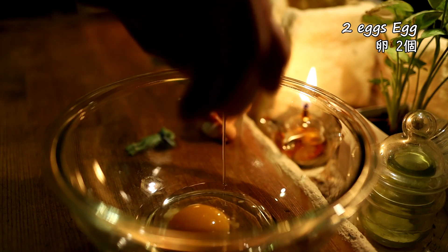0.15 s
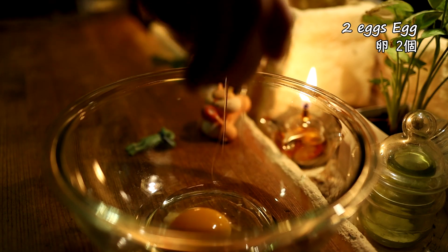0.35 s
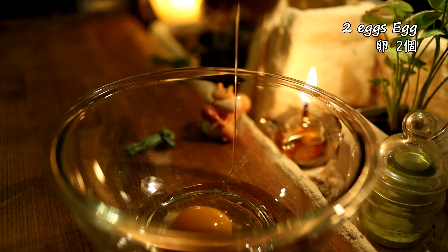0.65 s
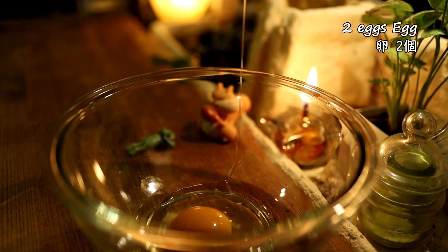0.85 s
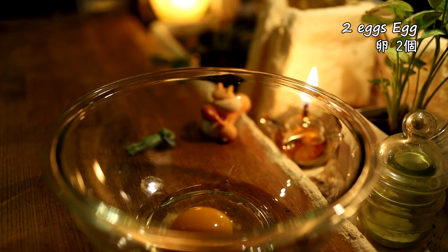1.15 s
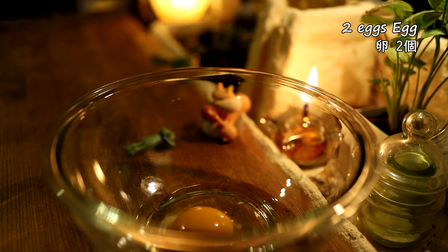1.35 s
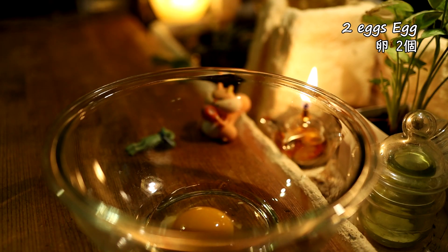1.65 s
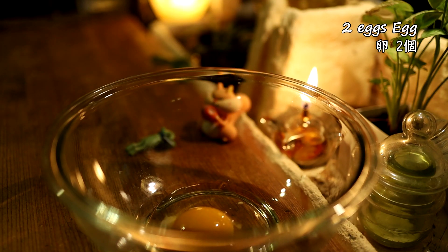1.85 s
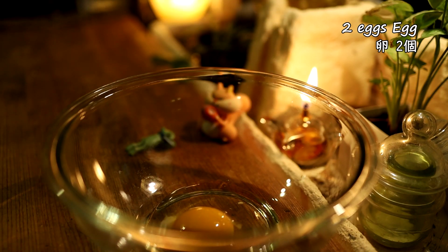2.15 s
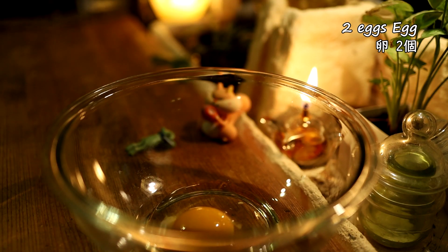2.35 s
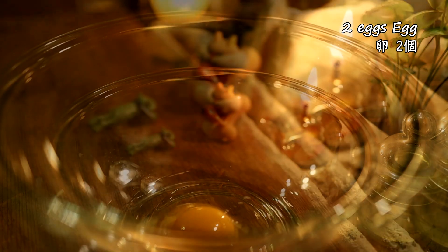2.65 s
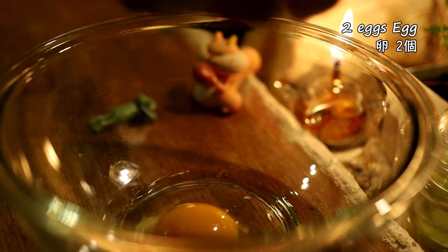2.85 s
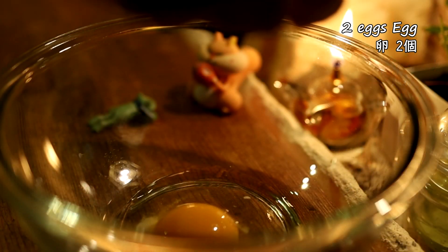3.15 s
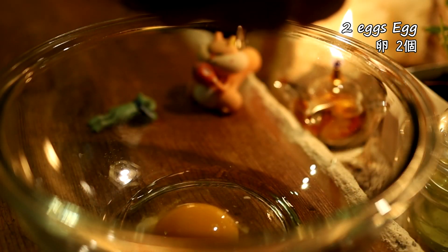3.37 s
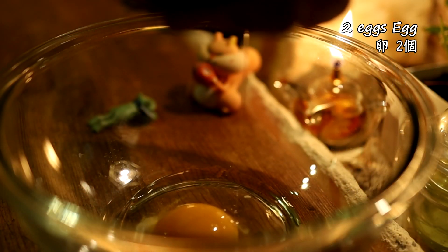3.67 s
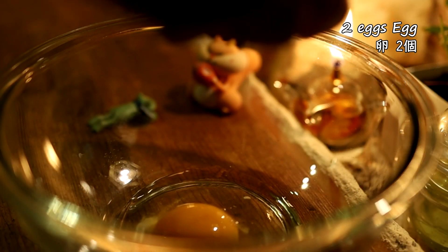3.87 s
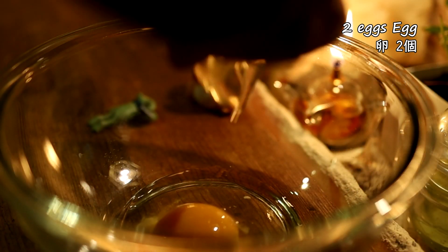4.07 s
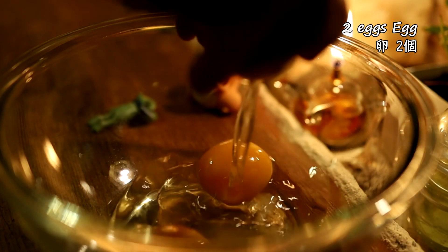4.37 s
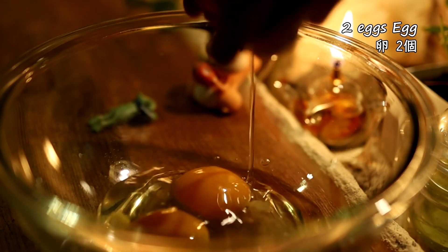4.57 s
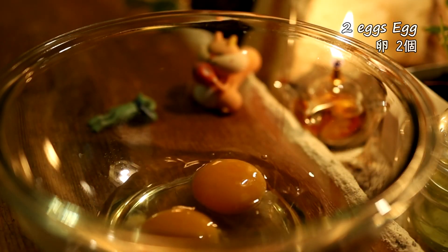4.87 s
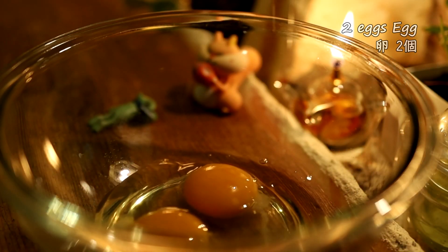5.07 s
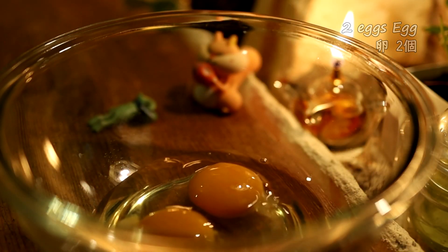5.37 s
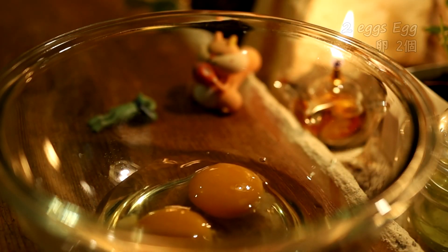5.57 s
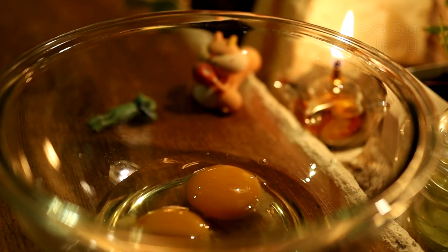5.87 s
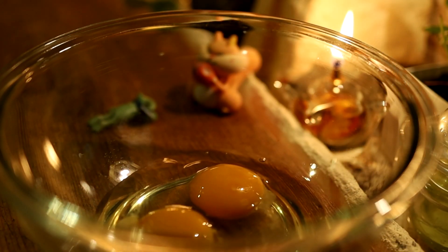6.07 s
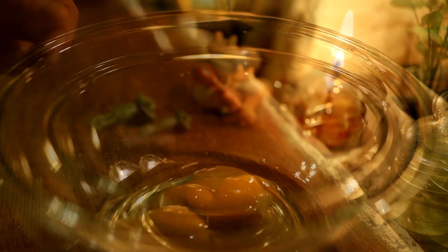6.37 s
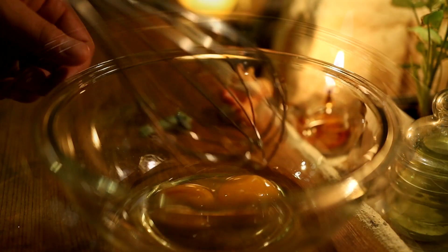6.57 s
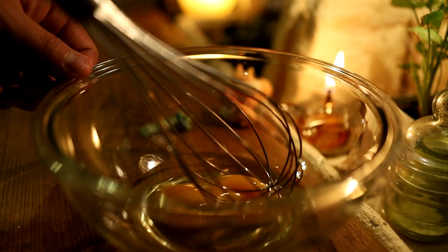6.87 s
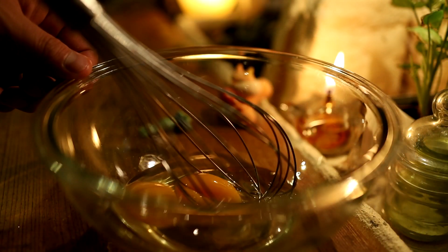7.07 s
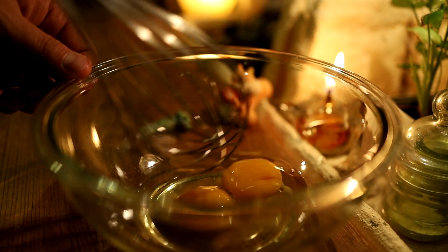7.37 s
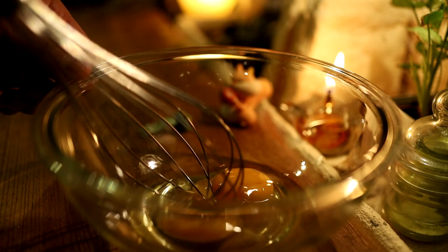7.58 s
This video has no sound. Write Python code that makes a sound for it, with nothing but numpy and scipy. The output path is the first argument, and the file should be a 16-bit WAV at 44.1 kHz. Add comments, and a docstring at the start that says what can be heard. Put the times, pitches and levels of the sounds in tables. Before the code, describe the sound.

Crisp eggshell crushing, two egg knocks on wood, a shell cracked open and crunched in the hand, then two light whisk clinks on glass.

```python
"""A small quiet room: an eggshell is crushed, an egg is knocked on a wooden table, cracked and pulled open
over a glass bowl; the empty shell crunches in the hand and a wire whisk touches the glass twice.
Shell sounds are short bursts of noise with a hollow ring; table and glass are sets of ringing pitches.
Behind them are a low table shudder, a steady hum with hiss, and an insect outside singing in throbbing phrases."""
import sys
import numpy as np
from scipy import signal
from scipy.fft import rfft, irfft, next_fast_len
from scipy.io import wavfile
from scipy.ndimage import uniform_filter1d

SR = 44100
rng = np.random.default_rng(int(sys.argv[2]) if len(sys.argv) > 2 else 0)


def natural_amplitude(level_db):
    """Convert a level in decibels to a linear amplitude factor, elementwise."""
    exponent = np.asarray(level_db, float) / 20
    return 10 ** exponent


def generate_wav(sig):
    """Save sig (samples, or channels by samples) to the path in sys.argv[1] as 16-bit PCM at SR."""
    pcm = np.round(np.clip(np.atleast_2d(sig).T, -1, 1) * 32767).astype(np.int16)
    wavfile.write(sys.argv[1], SR, pcm)


N = 340893      # length [samples]

# All levels are relative; the functions may add a base level.
# the loud shell snaps: (time [s], snap level [dB], hollow pitch [Hz], hollow level [dB re snap],
# top level [dB re snap])
SHELL_SNAPS = [(0.0278, -14, 2520, -2.5, 14), (0.0474, -35.5, 2960, 12.5, -8),
               (0.0744, -11.5, 2940, 1.8, 8.5), (0.0903, -33, 2920, -9, -4.5),
               (0.0993, -32, 2900, -7, -12.5), (0.1768, -21, 2800, -1.5, 17.5),
               (0.1795, -18, 2900, -5.5, -5), (0.1844, -18.5, 3130, -8, -2), (0.208, -20, 2900, -3, 6),
               (0.2751, -11, 2780, -1.3, 8), (0.2836, -11.3, 2850, 0.5, 14), (0.2905, -19, 2760, 0, -4.5),
               (0.2958, -12, 2850, -3.5, -2), (0.3005, -5, 2730, -3.5, 8), (0.3085, -29, 2870, -12, -0.5),
               (0.3232, -19, 3000, 0.5, 23.5), (0.3288, -13.5, 2940, -7, 11),
               (1.0714, -41.5, 2130, -3.5, -18.5), (1.4536, -45, 1400, 13, -21),
               (1.873, -15.5, 1400, 3, -28), (1.8852, -19.5, 1550, -1, -14), (2.5773, -43, 1990, -17, 7.5),
               (2.6252, -44, 1390, 0.5, 10), (2.7853, -23, 2030, -9, 7), (2.9622, -34.5, 3150, -9, 10),
               (2.9793, -45, 2100, -10, -10), (2.9995, -32, 3500, -9, 10), (3.022, -30.5, 3530, -3.7, 7),
               (3.0375, -35, 1850, -4, 11), (3.0636, -34, 1380, -2.5, -21), (3.0867, -21, 3720, -7, 8.5),
               (3.2569, -39, 2290, 4, 8), (3.2637, -25, 2200, -4.5, 8), (3.275, -30.5, 2360, -21, 18.5),
               (3.3997, -30.5, 1700, -12, 8), (3.404, -31.5, 1980, -19, -4.5), (3.4992, -34.5, 3650, -9, 6),
               (3.512, -42.5, 3570, -20, 13), (3.7278, -36.5, 1990, -3.5, 16),
               (3.7454, -34.5, 1420, -4, -21), (3.8448, -40, 1723, -11, 13), (3.854, -38, 2060, -16, 0),
               (3.917, -42, 3600, -5.5, 13), (4.0045, -30, 1450, -5.5, 7), (4.0386, -31, 3600, -0.5, -11),
               (4.0474, -16, 2100, -10, 7.5), (4.1075, -35, 2826, 6.5, 8), (4.1208, -25, 3650, -5.5, -7),
               (4.16, -35, 3520, -1, 14), (4.1803, -35.5, 2990, -10, 14), (4.2128, -32.5, 2730, 4.5, 11),
               (4.225, -21.3, 1720, -3, 2), (4.248, -24.5, 1390, 3, -7), (4.2535, -33, 1780, 8.5, 19),
               (4.2925, -31.5, 2730, 7.5, 5), (4.3088, -8.5, 1750, 0, -2), (4.3758, -26, 2720, 7, 15),
               (4.387, -4, 2030, -4, 1), (4.4066, -27.5, 2880, 12, -14.1), (4.416, -23, 2300, -14, -14),
               (4.4443, -26, 2760, 4.5, 14), (4.464, -23.2, 2690, 8, 6), (4.4696, -25.5, 2780, 12.5, 12),
               (4.489, -28, 2940, 10.5, -5), (4.509, -29, 2130, 5.5, -3), (4.5228, -39, 3070, 6, -12.6),
               (4.5592, -30, 2930, 5.5, -11), (4.567, -23, 2330, 3.5, 5), (4.5789, -25, 2850, 0, -18),
               (4.6009, -28, 2110, 7.5, 9), (4.6197, -32, 2760, 1, 6), (4.6489, -26, 3160, -18.5, 10),
               (4.659, -37, 3140, 3, -5), (4.6751, -35, 3400, 2, -2), (4.688, -33, 3450, -14, -3),
               (4.7017, -31.5, 2710, -1.5, 10), (4.74, -26, 2750, 4, -11), (4.744, -25, 2820, -0.5, 8),
               (4.7886, -24.5, 2880, -1.5, 15), (4.8267, -39, 2710, 3, -1), (4.8453, -27, 2200, 6, 2),
               (4.861, -31.5, 3080, 9, 18), (4.8986, -34.5, 3090, 4, 9), (4.941, -36, 2120, -1, -16),
               (4.9591, -34.5, 3100, 8, 15), (4.9668, -27, 2840, 2.5, -3), (4.9858, -25, 3080, -0.5, -20),
               (5.026, -39.5, 2800, -15, 11), (5.078, -42.5, 1400, -0.5, -11.4),
               (5.171, -42.5, 2880, -10, -19), (5.277, -30, 2950, -8, -11),
               (5.3205, -27.5, 3550, -2.5, -11.5), (5.3429, -22.5, 3370, -5, -8.8),
               (5.373, -30, 3480, 0, 3), (5.4315, -32, 3100, -6, -14), (5.4633, -32, 3030, -24, -14.2),
               (5.469, -29, 2910, -6, -15), (5.4981, -38, 2830, 0, 9), (5.531, -31, 2780, 4, -4),
               (5.536, -24.5, 2720, -1, -25), (5.5464, -27.5, 3070, -18, 8), (5.5556, -25.5, 2600, -1, -10),
               (5.5684, -25, 2620, -2, 5), (5.5804, -43, 3200, 9, -12), (5.6297, -29.5, 2600, -4, 2),
               (5.654, -32, 2100, 9, -11.9), (5.6634, -25, 3070, -3, -15), (5.6748, -27, 1970, 1.5, -12.4),
               (5.7088, -33, 2150, 4.5, -11.1), (5.7487, -36.5, 2240, -9, 4), (5.8377, -47, 3150, 13, 2),
               (5.8498, -30.5, 2000, -13, -14), (5.878, -25.5, 3760, -0.5, -19),
               (5.9104, -26.5, 3820, 1.5, 9.5), (5.9398, -25, 2210, -1.2, -19),
               (5.9757, -32, 2220, -4, -14), (5.9847, -38, 2600, -1.5, 2), (6.0463, -37, 3080, -6.8, -17),
               (6.082, -40, 1850, -7, 4), (6.1133, -42, 2240, -5, -4), (6.224, -33.5, 2650, -2, -10.4),
               (6.2554, -30.5, 2510, -4, -19), (6.3106, -43, 2340, 1, -14), (6.383, -37, 3670, 4.5, -13.5),
               (6.3908, -34, 2050, -5.5, -17), (6.437, -37.5, 1950, -8, -13), (6.3337, -53, 2460, 10, -6),
               (6.4905, -24, 2210, -30, -31), (6.4986, -35, 2350, 3, -24), (6.5454, -35, 1525, -8.5, -9.6),
               (6.5978, -35, 3220, -18, -18), (6.635, -50, 1770, 7, -5), (6.785, -59, 1900, 7.5, -10)]
# where the hands hold the shell: (time [s], left minus right [dB])
HAND_POSITIONS = [(0, -1), (1.3, -3), (1.87, 9.5), (2.1, -0.5), (4.0, 0.4), (5.8, -1.3), (6.5, 5)]
PAN_SCATTER_DB = 3.5
# the fingers squeeze or pull the shell: (start [s], end [s], crunch level [dB], hollow pitch [Hz],
# hollow level [dB re crunch])
SQUEEZES = [(0.039, 0.12, -58, 2850, -22), (0.175, 0.217, -39, 3030, -18), (0.279, 0.333, -52, 2960, -3),
            (2.56, 2.646, -58, 2000, -15), (2.939, 3.046, -52.5, 2170, -11), (3.248, 3.6, -61.5, 2270, -15),
            (3.718, 3.99, -72, 2100, -12), (4.037, 4.1, -37.5, 2790, -10), (4.11, 4.206, -54.5, 2490, 5),
            (4.216, 4.3, -41.5, 1820, -10), (4.31, 4.396, -34.5, 1970, -9), (4.409, 4.525, -34, 2750, -4),
            (4.54, 4.707, -47, 2660, -7), (4.737, 4.92, -43, 2720, -9), (4.947, 5.004, -43, 3000, -3),
            (5.058, 5.3, -68.5, 2600, -2), (5.405, 5.536, -42.5, 3080, -5), (5.524, 5.693, -47, 2600, -2),
            (5.697, 5.775, -52, 2100, 0.5), (5.84, 6.006, -56, 2250, 7.5), (6.02, 6.18, -57.5, 2520, -4.5),
            (6.199, 6.47, -67, 2410, 6), (6.49, 6.652, -65.5, 2050, 5.5)]
GRIP_S, LET_GO_DB_PER_S = 0.02, 597.5      # a squeeze builds up, holds, then dies away
MEAN_SQUEEZE_DB = -55      # the squeeze level at which faint snaps have their middle level
# faint snaps: rate, level in a mean squeeze, share of the squeeze's swing they follow, scatter
FAINT_PER_S, FAINT_DB, FAINT_FOLLOWS, FAINT_SCATTER_DB = 20, -44.5, 0.47, 4
# their colour; the hollow pitch scatters in natural-log steps
FAINT_HOLLOW_DB, FAINT_TOP_DB, COLOUR_SCATTER_DB, HOLLOW_SCATTER = -4, 0, 3.5, 0.34
# colour of the crunching shell: (frequency [Hz], level [dB])
SHELL_SPECTRUM = [(500, -36.5), (800, -24), (1200, -23.5), (2000, -16), (4000, 11), (7300, 5.5),
                  (11000, 2.5), (15500, -9)]
# colour of the whole egg caving in on the hard knock: (frequency [Hz], level [dB])
SMASH_SPECTRUM = [(400, -8), (800, 2), (1400, 2), (2500, -5), (4500, 0), (7000, -7), (10000, -15),
                  (15500, -12), (17000, -50)]
SMASH_S, SMASH_DB, SMASH_HOLD_S, SMASH_DB_PER_S = 1.8728, -22, 0.012, 1300
# egg and fingers knocking on table and bowl: (time [s], peak level [dB], brightness [dB per octave])
KNOCKS = [(0.028, -40, 17), (0.0745, -48.5, 17), (0.177, -47, 17.5), (0.276, -38, 16), (0.301, -34, 17.5),
          (0.325, -42, 14), (1.454, -16, 1), (1.872, -20.5, 15), (2.785, -44.5, 5), (2.963, -43, 16),
          (3.022, -47, 14), (3.064, -45.5, 20), (3.087, -40.5, 18), (3.263, -45, 11), (3.746, -46, 17),
          (4.004, -41, 30), (4.049, -31.5, 33), (4.224, -47, 7), (4.388, -41, 18), (4.508, -37.5, 25),
          (4.568, -52, -6), (4.6, -64, 14), (4.735, -43, 12), (4.846, -46, 7), (5.674, -44.5, 17)]
# table and bowl under a knock: (frequency [Hz], level [dB], time to fall 60 dB [s])
TABLE_MODES = [(191, 6.5, 0.12), (315, 5.5, 0.08), (363, 6, 0.031), (569, 3, 0.06), (667, 16, 0.016),
               (755, 1.5, 0.044), (797, -39, 0.035), (1330, -24, 0.049)]
# whisk on glass: (time [s], level [dB])
WHISK_TOUCHES = [(7.038, -29.5), (7.1198, -31.5)]
# whisk and bowl: (frequency [Hz], first touch level [dB], second touch level [dB], time to fall 60 dB [s])
GLASS_MODES = [(522, -21.5, -31, 0.25), (795, -21, -18, .12), (955, -18.5, -30, 0.23),
               (1610, -23, -33, 0.28), (3180, -17, -25, 0.14), (4280, -20, -13, 0.14),
               (4870, -4.5, -20, 0.047), (6350, -12, -22.5, 0.079), (6550, -10, 10.5, 0.025),
               (7200, -7.5, -24, 0.08), (8100, -23, -51, 0.14), (8150, -19.5, 2, 0.041),
               (8705, -3, -22, 0.11), (9830, -6, 0, 0.084), (10200, -0.5, -25, 0.11),
               (11500, -12, -11, 0.07), (12100, -11, -20, 0.07), (13400, -20, -22, 0.07)]
# fingers brush the shell in soft puffs: (start [s], end [s], level [dB], low edge [Hz], high edge [Hz])
BRUSHES = [(1.058, 1.077, -54.5, 5300, 6840), (1.05, 1.083, -59.5, 1900, 4200),
           (1.205, 1.216, -59, 3000, 9000), (1.268, 1.298, -53, 1980, 11500),
           (1.323, 1.328, -61, 6500, 11500), (1.44, 1.466, -54.5, 2300, 9600),
           (2.03, 2.07, -54, 2960, 7400), (2.02, 2.08, -55.5, 696, 2560)]
# how long the room rings: (frequency [Hz], time to fall 60 dB [s])
ROOM_DECAY = [(150, 0.52), (700, 0.24), (2000, 0.24), (5000, 0.29), (13000, 0.19)]
# the table's low shudder after a knock or a push: (time of its crest [s], level [dB])
SHUDDERS = [(1.499, -29.5), (1.585, -41.5), (1.8, -67), (1.922, -29.5), (2.039, -34), (2.078, -37),
            (2.21, -49), (4.385, -48), (6.25, -51), (6.42, -55), (7.08, -49), (7.22, -61)]
# a quick fall, then a weak hum that lingers
SHUDDER_RISE_S, SHUDDER_DB_PER_S, LINGER_DB, LINGER_DB_PER_S = 0.024, 335, -18, 35
# insect phrases: (start [s], end [s], time of one crest [s])
INSECT_PHRASES = [(-.2, 0.72, .585), (1.2, 3.258, 2.18), (3.69, 5.6, 5.08), (5.6, 6.62, 6.17),
                  (6.78, 8.0, 7.365)]
THROBS_PER_S, SONG_DB, THROB_DB = 7.6, -56.5, 7.5      # a throb falls THROB_DB below its crest
# colour of the room tone: (frequency [Hz], level [dB])
HUM_SPECTRUM = [(15, -26), (25, -15.5), (53, -13.5), (97, -2.5), (161, -1), (190, -9), (344, -5.5),
                (560, -14.5), (775, -14.5), (887, -16), (962, -18), (4490, -25), (4870, -26),
                (14000, -27.5), (16000, -26)]
HUM_DB = -54.5
# left-right likeness of the room tone: (frequency [Hz], likeness [0 = unrelated, 1 = identical])
HUM_LIKENESS = [(60, .6), (180, .55), (400, .25), (800, 0), (15000, 0)]
# the background level dips briefly before the hard knock: (start [s], end [s], change [dB])
BACKGROUND_DIP = (1.84, 1.869, -11)


def rms_one(x):
    """Scale to rms 1."""
    return x / np.sqrt(np.mean(x ** 2) + 1e-20)


def peak_one(x):
    """Scale to peak 1."""
    return x / (np.abs(x).max() + 1e-12)


def energy_one(x):
    """Scale a short burst to unit energy per channel."""
    return x / np.sqrt(np.sum(x ** 2) / len(np.atleast_2d(x)) + 1e-20)


def at_hz(points, hz):
    """Read a curve at the given frequencies, on a log-frequency axis."""
    curve_hz, values = np.transpose(points)
    return np.interp(np.log(np.maximum(hz, 1)), np.log(curve_hz), values)


def colour(x, spectrum):
    """Shape the last axis of x with a spectrum."""
    size = x.shape[-1]
    gain = natural_amplitude(at_hz(spectrum, np.fft.rfftfreq(size, 1 / SR)))
    return irfft(rfft(x) * gain, size)


def band(x, low_hz, high_hz):
    """Keep the frequencies between two edges (Butterworth band-pass)."""
    return signal.sosfilt(signal.butter(2, [low_hz, high_hz], "band", fs=SR, output="sos"), x)


def ring(x, hz, t60):
    """A unit click sets a dying sine of height 1 ringing; t60 is its time to fall 60 dB [s]."""
    r, w = natural_amplitude(-60 / (t60 * SR)), 2 * np.pi * hz / SR
    return signal.lfilter([0, np.sin(w)], [1, -2 * r * np.cos(w), r * r], x + 1e-18)


def swell(start, end, rise_s, fall_db_per_s):
    """Gain that rises until start, holds until end and then decays."""
    t = np.arange(N) / SR
    rise = np.clip(1 + (t - start) / rise_s, 0, 1) ** 2
    return rise * natural_amplitude(-fall_db_per_s * np.maximum(t - end, 0))


def stereo_noise(apart):
    """Noise shared by both ears plus a share of separate noise in each."""
    shared, left, right = rng.standard_normal((3, N))
    return shared + apart * np.array([left, right])


def alike_noise(size, alike):
    """Two noises of equal strength whose likeness is set from 0 to 1."""
    shared, left, right = rng.standard_normal((3, size))
    return np.sqrt(alike) * shared + np.sqrt(1 - alike) * np.array([left, right])


def snaps(edge_db=13.5, hollow_db=14.5, body_db=6.5, top_db=1.5, after=0.36, after_s=0.0053, apart=0.33, top_apart=2.9):
    """Each break is a sharp tick and a longer tear: a bright edge, a top, and the hollow shell ringing briefly."""
    size = 1000      # samples in one break
    out, t = np.zeros((2, N + size)), np.arange(size) / SR
    decay = np.exp(-t / 0.00096) + after * np.exp(-t / after_s)
    shape = decay * (1 - np.exp(-t / 0.00011))
    breaks = SHELL_SNAPS + faint_snaps()
    tears = rfft(rng.standard_normal((len(breaks), 3, size)) * shape)
    # a break excites all pitches evenly
    tears = irfft(tears / np.sqrt(uniform_filter1d(np.abs(tears) ** 2, size=9)))
    sway = PAN_SCATTER_DB * rng.standard_normal(len(breaks))
    for (s, db, hz, low_db, high_db), tear, off_db in zip(breaks, tears, sway):
        pan_db = np.interp(s, *np.transpose(HAND_POSITIONS)) + off_db
        # the treble leaves the shell differently toward each ear
        edge = natural_amplitude(edge_db) * energy_one(band(tear[0] + apart * tear[1:], 3900, 8150))
        top = natural_amplitude(high_db + top_db) * energy_one(band(tear[0] + top_apart * tear[1:], 7200, 15000))
        hollow = natural_amplitude(hollow_db) * energy_one(ring(tear[0], hz, 16 / hz))
        body = natural_amplitude(body_db) * energy_one(band(tear[1], 0.97 * hz, 1.47 * hz))
        gain = natural_amplitude(db + np.array([[.5], [-.5]]) * pan_db)
        at = round(s * SR)
        out[:, at:at + size] += gain * (edge - top + natural_amplitude(low_db) * (hollow + body))
    return band(band(out[:, :N], 1105, 20000), 750, 21000)      # so small a shell radiates no bass


def faint_snaps():
    """Rows like those of the loud snaps, at chance moments in each squeeze and following its strength."""
    rows = []
    for start, end, squeeze_db, hz, _ in SQUEEZES:
        gaps, chance = rng.exponential(1, size=12), rng.standard_normal((12, 4))
        times = start + np.cumsum(gaps) / FAINT_PER_S
        middle_db = FAINT_DB + FAINT_FOLLOWS * (squeeze_db - MEAN_SQUEEZE_DB)
        for s, (a, b, c, d) in zip(times, chance):
            if s < end:
                snap_db = middle_db + FAINT_SCATTER_DB * a
                hollow_hz = hz * np.exp(HOLLOW_SCATTER * b)
                hollow_db = FAINT_HOLLOW_DB + COLOUR_SCATTER_DB * c
                top_db = FAINT_TOP_DB + COLOUR_SCATTER_DB * d
                rows.append((s, snap_db, hollow_hz, hollow_db, top_db))
    return rows


def crunch(per_s=2500., spread_db=2.5, lift_db=-10.5, apart=0.94, clump_db=3.0):
    """Dense tiny fractures; the hollow that colours them changes as the shell opens."""
    level, hollow_hz, hollow_db = squeezing()
    sizes = natural_amplitude(spread_db * np.minimum(rng.exponential(1, N), 3)) * (rng.random(N) < per_s / SR)
    # fractures come in clumps
    sizes *= natural_amplitude(clump_db * rms_one(uniform_filter1d(rng.standard_normal(N), size=500)))
    tearing = signal.lfilter([1], [1, -.96], sizes)      # each fracture fades by e in under a millisecond
    shared, left, right = tearing * rng.standard_normal((3, N))
    out = colour(shared + apart * np.array([left, right]), SHELL_SPECTRUM)
    out /= np.std(band(out, 6200, 12000))
    for hz in np.geomspace(1400, 3400, 10):
        # fixed resonators, each heard when the moving hollow is near
        near = np.exp(-.5 * (np.log(hollow_hz / hz) / .1) ** 2)
        resonance = rms_one(band(ring(shared, hz, 14 / hz), 1100, 5000))
        out += natural_amplitude(hollow_db) * near * resonance
    return level * natural_amplitude(lift_db) * out


def squeezing():
    """Crunch gain, hollow Hz and hollow dB at every sample; the strongest squeeze leads."""
    gains = np.array([natural_amplitude(db) * swell(start, end, GRIP_S, LET_GO_DB_PER_S)
                      for start, end, db, _, _ in SQUEEZES]) + 1e-9
    level = gains.sum(axis=0)
    hollow_hz, hollow_db = np.array(SQUEEZES)[:, 3:].T @ gains / level
    return level, hollow_hz, hollow_db


def smash(apart=0.69):
    """The whole egg caves in: one broad, even crack with a noisy tail."""
    noise = rms_one(colour(stereo_noise(apart), SMASH_SPECTRUM))
    return natural_amplitude(SMASH_DB) * swell(SMASH_S, SMASH_S + SMASH_HOLD_S, .0004, SMASH_DB_PER_S) * noise


def knocks(contact_s=0.00017):
    """A blunt contact is a short push that sets the pitches of table and bowl ringing."""
    out, t = np.zeros(N), np.arange(200) / SR
    for s, db, bright_db in KNOCKS:
        push = np.zeros(N)
        push[round(s * SR):][:200] = peak_one(t * np.exp(-t / contact_s))
        body = np.zeros(N)
        for hz, mode_db, t60 in TABLE_MODES:
            body += natural_amplitude(mode_db + bright_db * np.log2(hz / 500)) * ring(push, hz, t60)
        out += natural_amplitude(db) * peak_one(band(body, 117.0, 6000))
    return out


def whisk(level_db=-9.5):
    """Two light touches of wire set the glass ringing, each at another spot."""
    out = np.zeros(N)
    times, touch_db = np.transpose(WHISK_TOUCHES)
    for hz, first_db, second_db, t60 in GLASS_MODES:
        clicks = np.zeros(N)
        clicks[np.round(times * SR).astype(int)] = natural_amplitude(touch_db + [first_db, second_db] + level_db)
        out += ring(clicks, hz, t60)
    # the wire rolls on: each touch starts weak and reaches full level in 3 ms
    moments = [s + d for s in times for d in (-.001, 0, .003)]
    return out * np.interp(np.arange(N) / SR, moments, [1, .2, 1] * 2)


def brushes(rise_s=0.0043, fall_db_per_s=700, apart=0.64):
    """Fingers rub the shell: short smooth puffs of noise, each in its own band."""
    noise, out = stereo_noise(apart), np.zeros((2, N))
    for start, end, db, low_hz, high_hz in BRUSHES:
        puff = rms_one(band(band(noise, low_hz, high_hz), low_hz, high_hz))
        out += natural_amplitude(db) * swell(start, end, rise_s, fall_db_per_s) * puff
    return out


def room(x, gap_s=0.00042, alike=0.32):
    """Dense reflections that die band by band, partly different in each ear."""
    t, tail = np.arange(22000) / SR, 0
    for hz in 100 * 2. ** np.arange(8):      # octave bands
        noise = band(alike_noise(len(t), alike), hz / np.sqrt(2), min(hz * np.sqrt(2), 18000))
        tail = tail + noise * natural_amplitude(-60 * t / at_hz(ROOM_DECAY, hz))
    tail = tail * np.clip(t / gap_s - .5, 0, 1)      # a short gap before the first reflection
    tail /= np.sqrt(np.sum(tail ** 2) / 2)
    return signal.fftconvolve(x[None], tail, axes=1)[:, :N]


def boom(centre_hz=101.9, t60=0.27):
    """The table shudders around one low pitch; each jolt swells quickly, drops and lingers."""
    wave = band(ring(rng.standard_normal(N), centre_hz, t60), 47, 132)
    jolts = np.zeros(N)
    for s, db in SHUDDERS:
        quick = swell(s, s, SHUDDER_RISE_S, SHUDDER_DB_PER_S)
        linger = natural_amplitude(LINGER_DB) * swell(s, s, SHUDDER_RISE_S, LINGER_DB_PER_S)
        jolts += natural_amplitude(db) * (quick + linger)
    # even out the chance swings of the noise
    size = uniform_filter1d(np.abs(signal.hilbert(wave, next_fast_len(N))[:N]), size=900)
    return band(jolts * rms_one(wave / (size + 0.33 * size.mean())), 50, 226)


def insect(alike=0.42):
    """A rasp of noise in one narrow band that throbs within each phrase."""
    t, level = np.arange(N) / SR, np.zeros(N)
    for start, end, crest in INSECT_PHRASES:
        gate = np.clip((t - start) / 0.13, 0, 1) * np.clip((end - t) / 0.098, 0, 1)
        throb = np.sin(np.pi * THROBS_PER_S * (t - crest)) ** 2
        level += gate * natural_amplitude(SONG_DB - THROB_DB * throb)
    return level * rms_one(band(band(alike_noise(N, alike), 5040, 5600), 4550, 5740))


def hum():
    """Steady room tone and microphone hiss: coloured noise, alike in both ears only in the bass."""
    mid, side = rfft(rng.standard_normal((2, N)))
    hz = np.fft.rfftfreq(N, 1 / SR)
    alike = np.clip(at_hz(HUM_LIKENESS, hz), -1, 1)
    pair = np.sqrt(1 + alike) * mid + np.sqrt(1 - alike) * side * np.array([[1], [-1]])
    return natural_amplitude(HUM_DB) * rms_one(irfft(pair * natural_amplitude(at_hz(HUM_SPECTRUM, hz)), N))


def scene():
    """Shell, table and whisk are near the microphone; the room answers."""
    thuds = knocks()
    near = snaps() + crunch() + whisk() + brushes() + smash()
    panned_thuds = thuds * natural_amplitude(np.array([[2.5], [-2.5]]))      # left louder than right
    reflections = room(natural_amplitude(-8.0) * near.mean(axis=0) + natural_amplitude(-3.0) * thuds)
    t = np.arange(N) / SR
    start, end, change_db = BACKGROUND_DIP
    dip = natural_amplitude(change_db * uniform_filter1d(1. * (t > start) * (t < end), size=200))
    background = dip * (boom() + insect() + hum())
    return near + panned_thuds + reflections + background


def top_cut(x):
    """Nothing passes above the cut-off."""
    return signal.sosfilt(signal.butter(12, 16660, fs=SR, output="sos"), x)


def record(dry):
    """Peaks near full scale are rounded, then the highest treble is cut."""
    rounded = dry / (1 + np.abs(dry) ** 4) ** .25
    mix = signal.sosfilt(signal.cheby2(10, 60, 16700, fs=SR, output="sos"), rounded)
    return top_cut(mix)


dry = scene()
out = record(dry)
generate_wav(out)
```